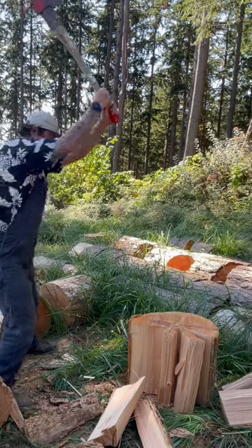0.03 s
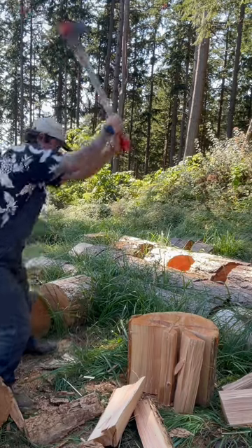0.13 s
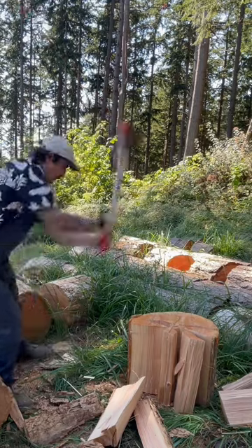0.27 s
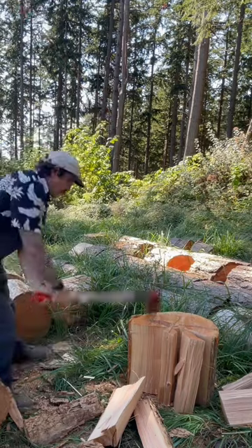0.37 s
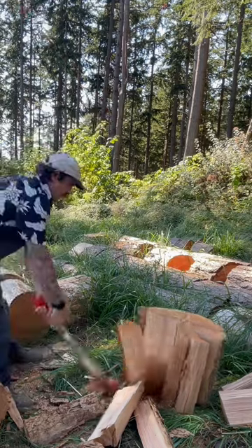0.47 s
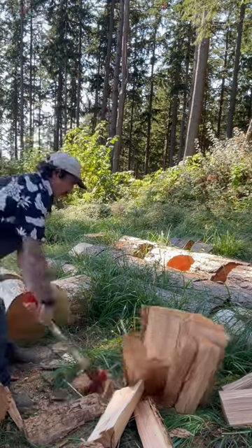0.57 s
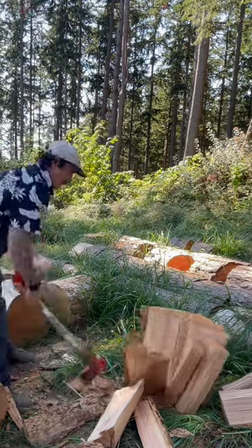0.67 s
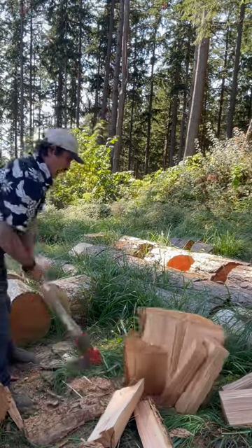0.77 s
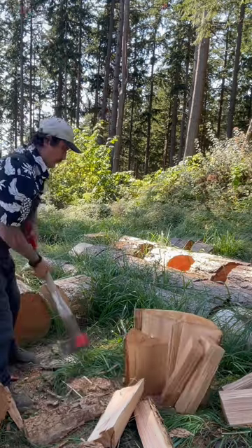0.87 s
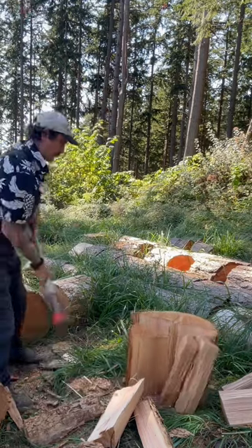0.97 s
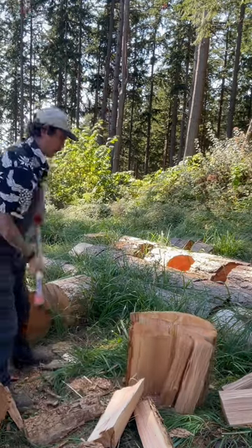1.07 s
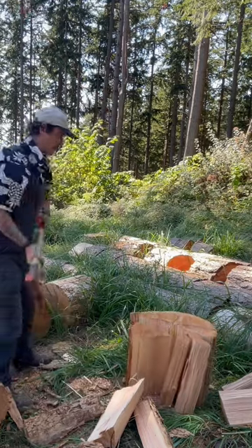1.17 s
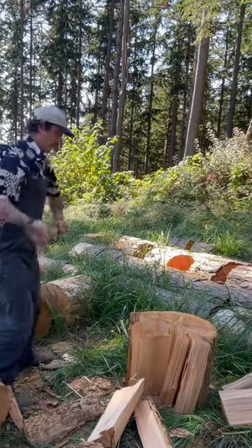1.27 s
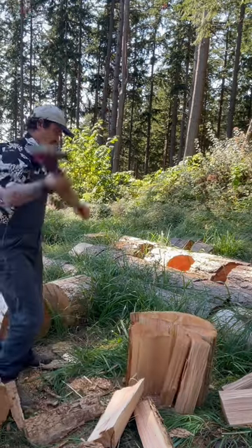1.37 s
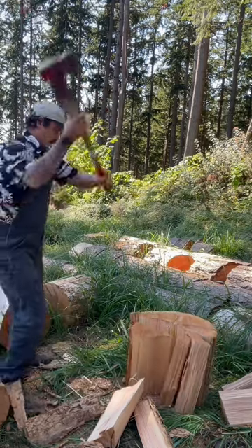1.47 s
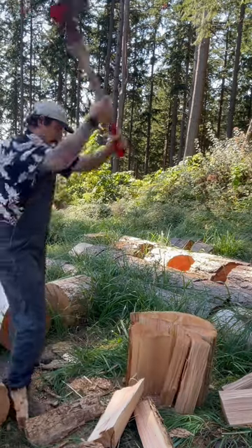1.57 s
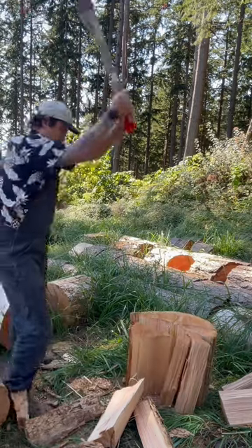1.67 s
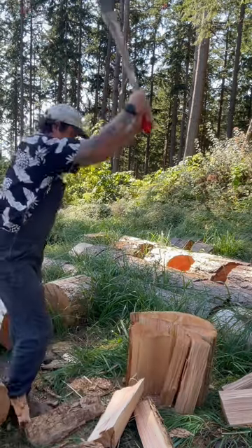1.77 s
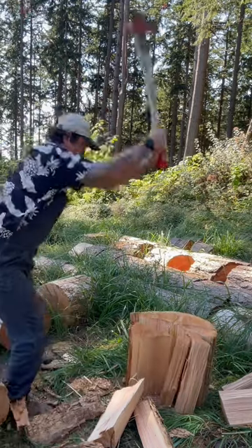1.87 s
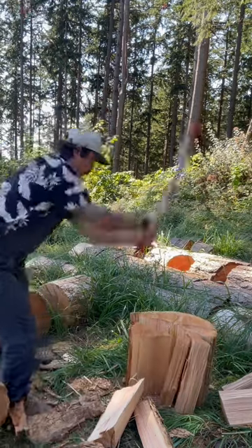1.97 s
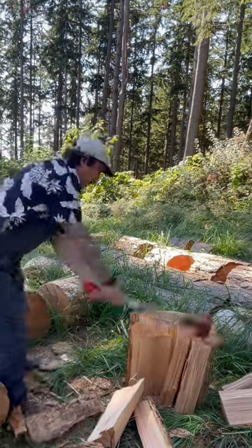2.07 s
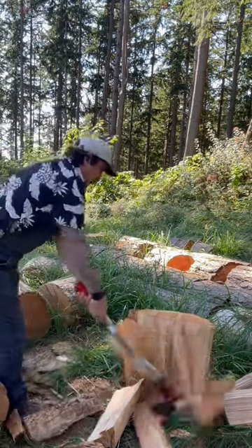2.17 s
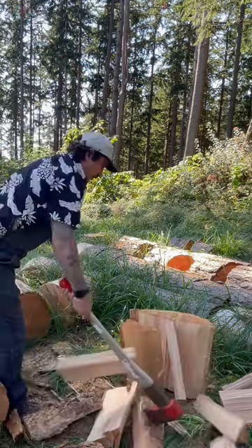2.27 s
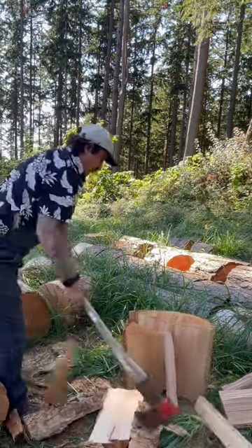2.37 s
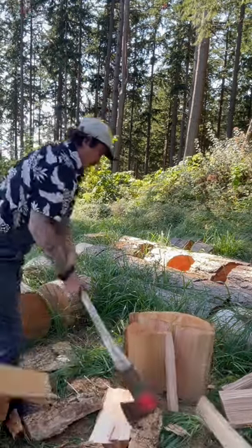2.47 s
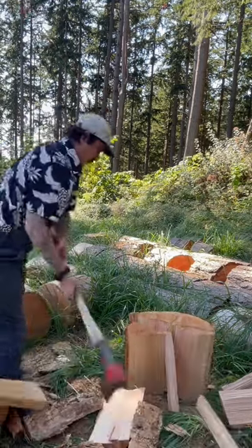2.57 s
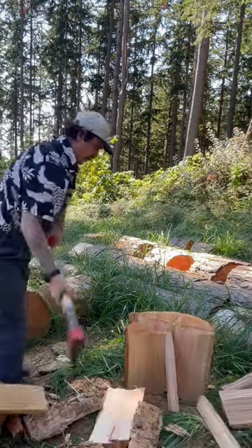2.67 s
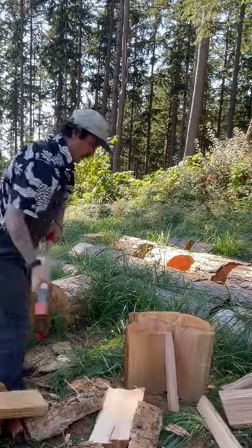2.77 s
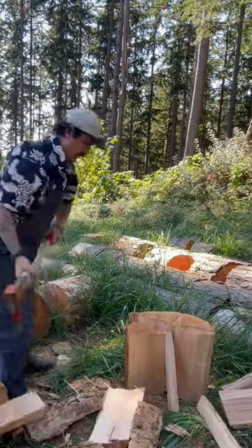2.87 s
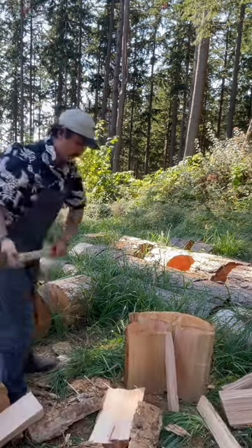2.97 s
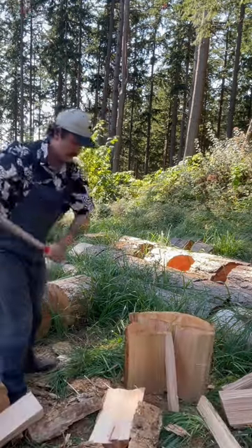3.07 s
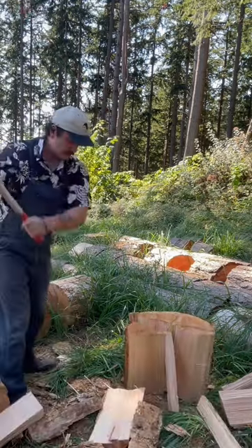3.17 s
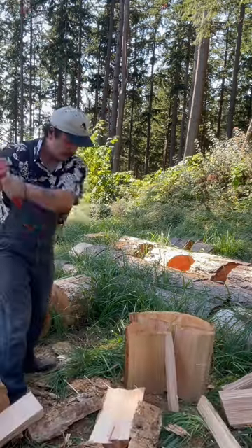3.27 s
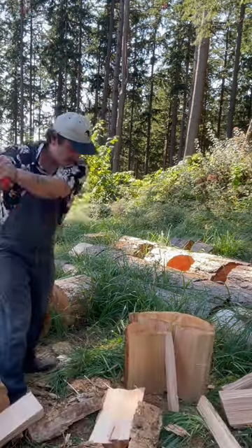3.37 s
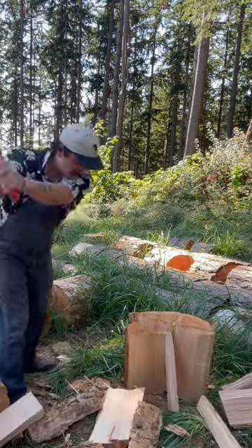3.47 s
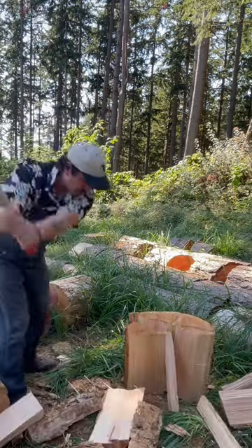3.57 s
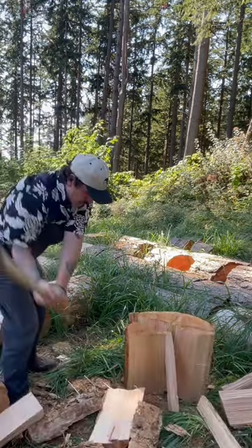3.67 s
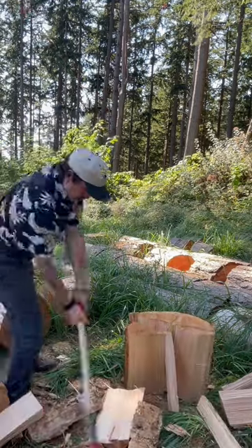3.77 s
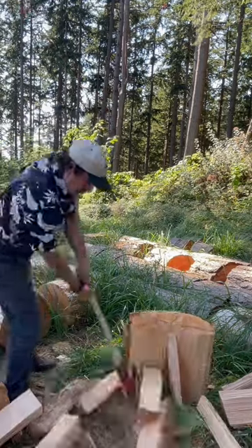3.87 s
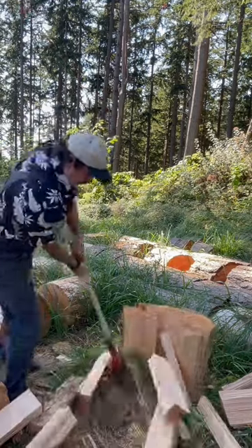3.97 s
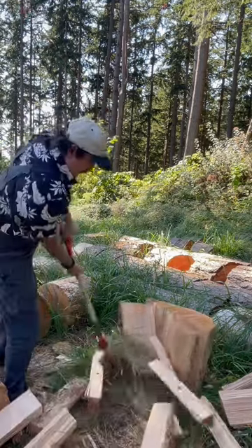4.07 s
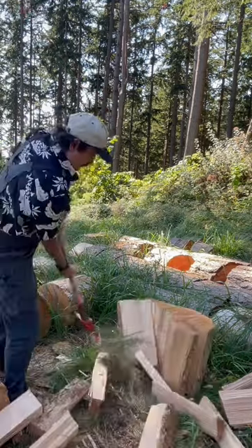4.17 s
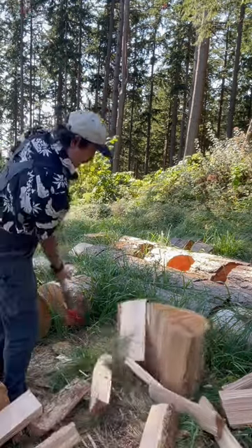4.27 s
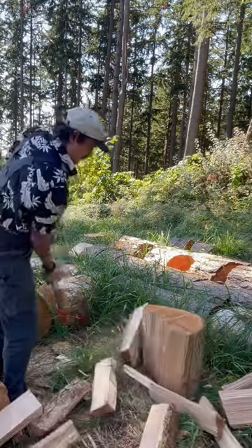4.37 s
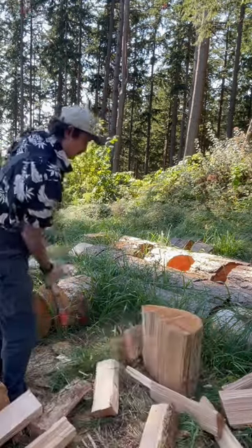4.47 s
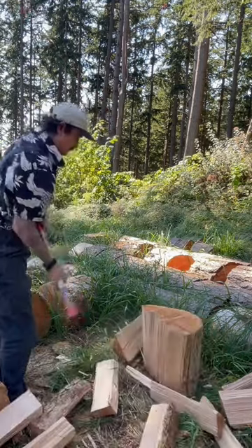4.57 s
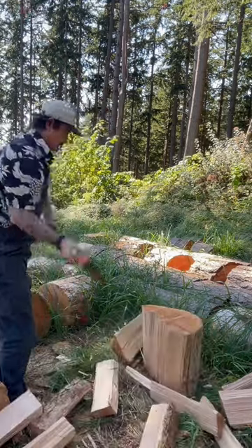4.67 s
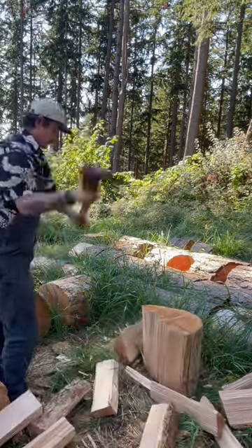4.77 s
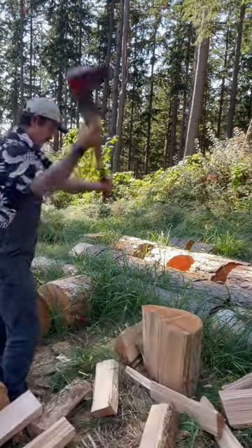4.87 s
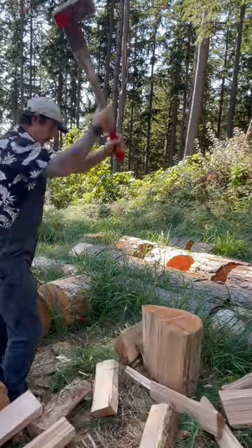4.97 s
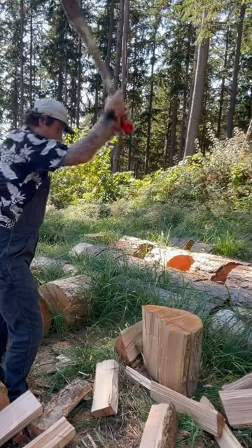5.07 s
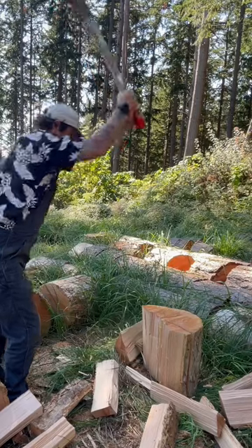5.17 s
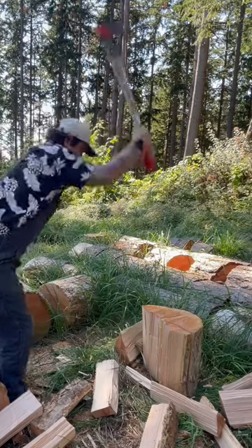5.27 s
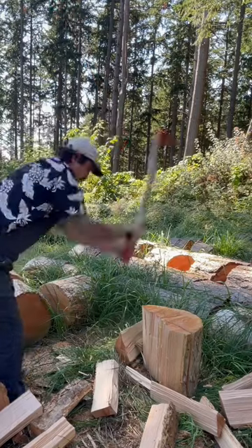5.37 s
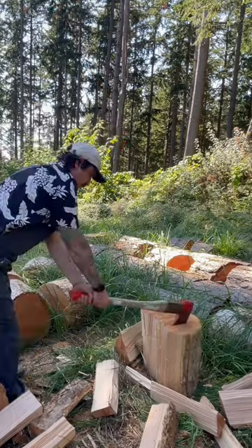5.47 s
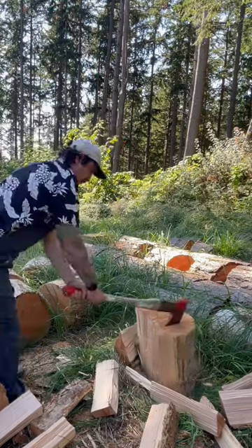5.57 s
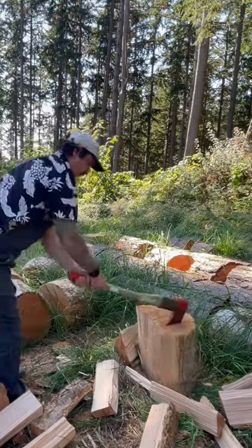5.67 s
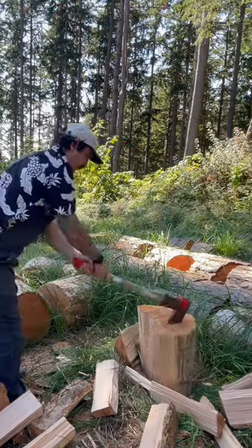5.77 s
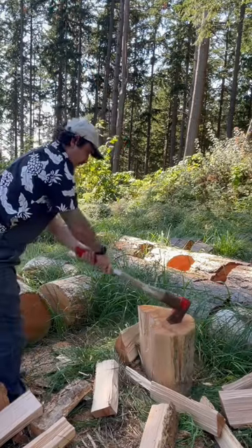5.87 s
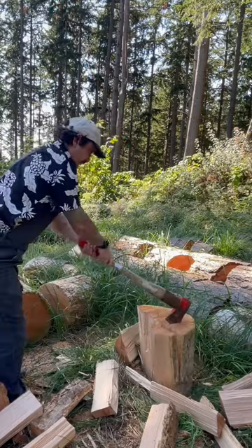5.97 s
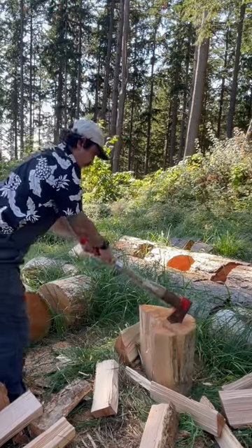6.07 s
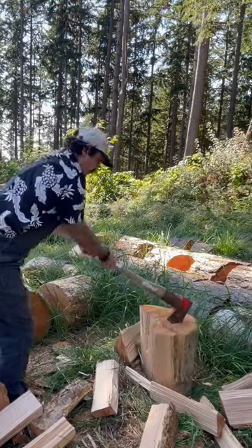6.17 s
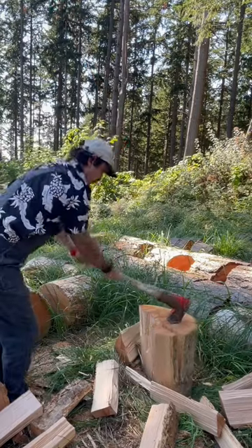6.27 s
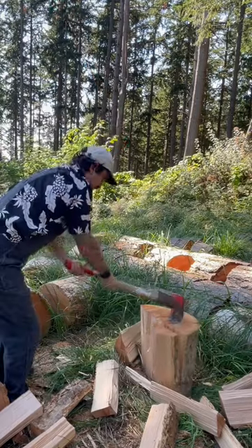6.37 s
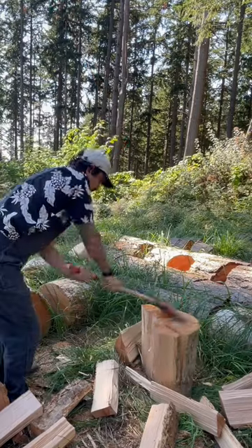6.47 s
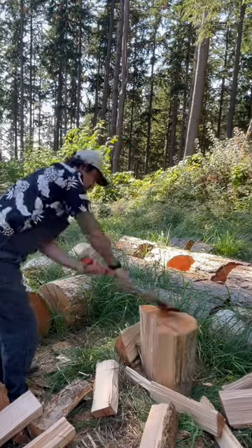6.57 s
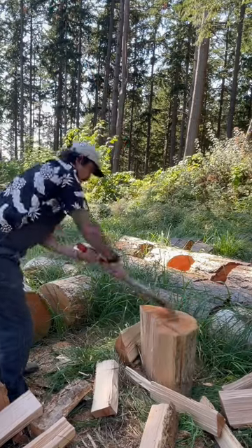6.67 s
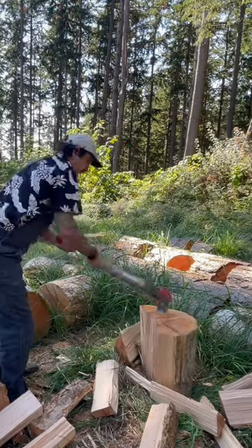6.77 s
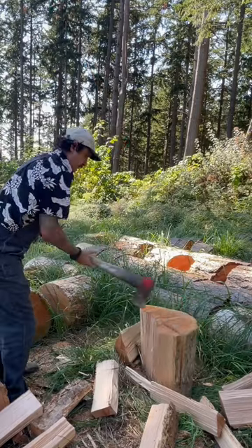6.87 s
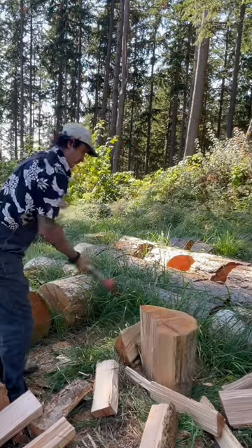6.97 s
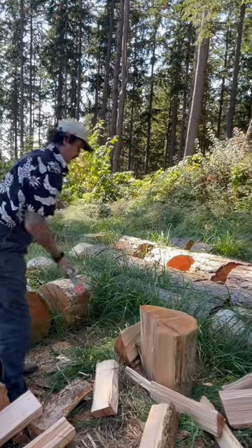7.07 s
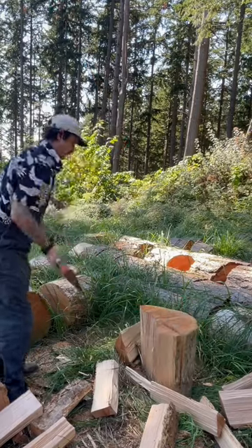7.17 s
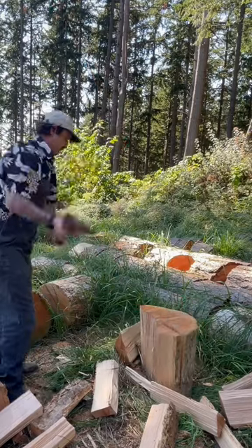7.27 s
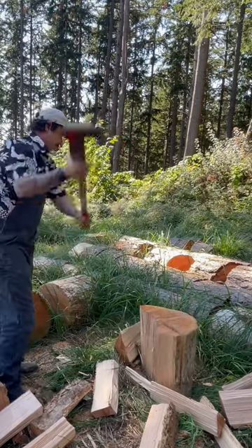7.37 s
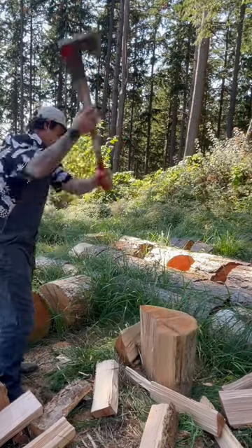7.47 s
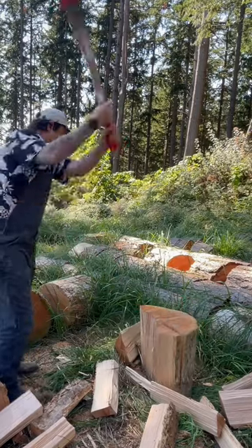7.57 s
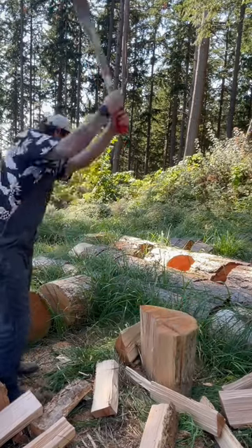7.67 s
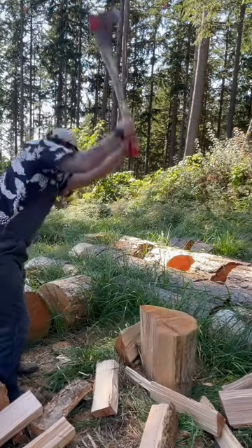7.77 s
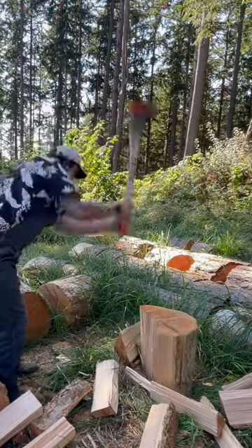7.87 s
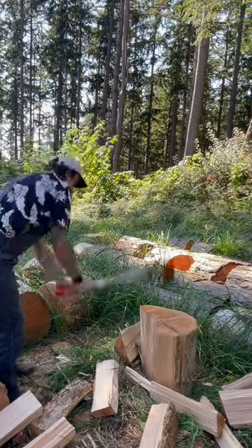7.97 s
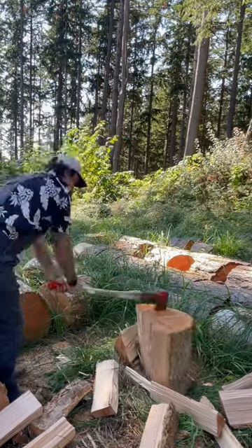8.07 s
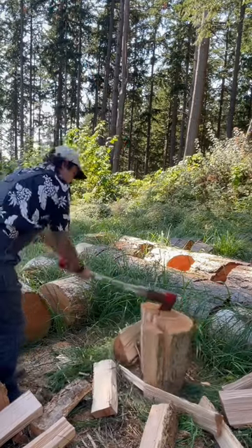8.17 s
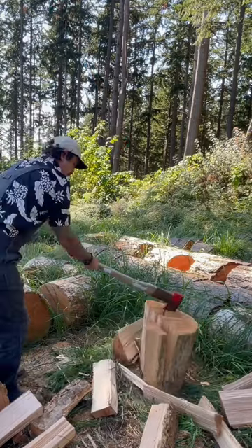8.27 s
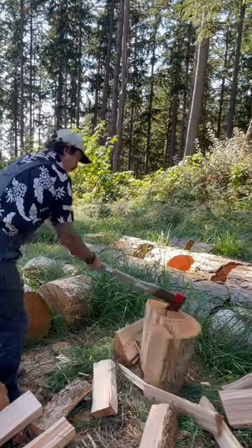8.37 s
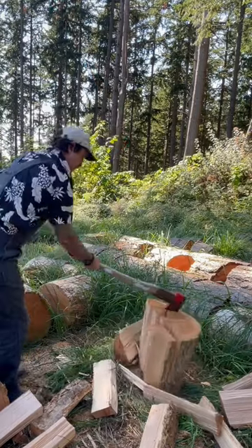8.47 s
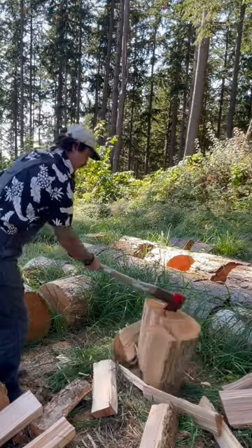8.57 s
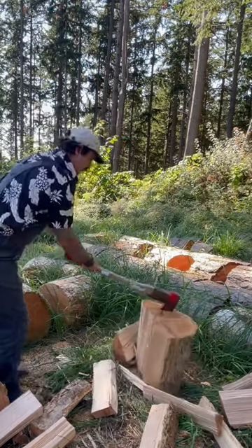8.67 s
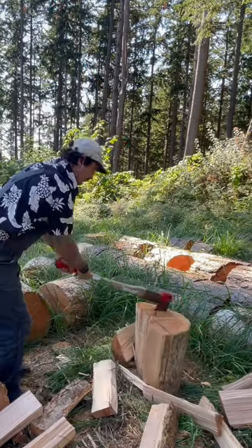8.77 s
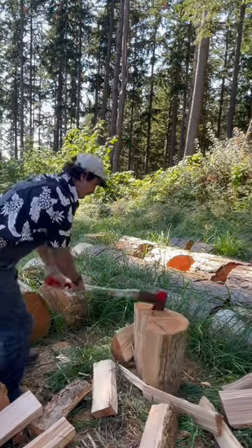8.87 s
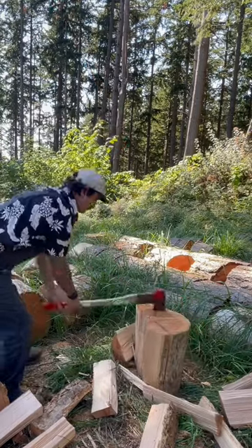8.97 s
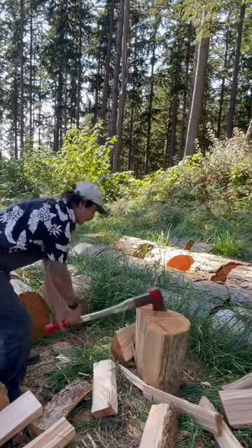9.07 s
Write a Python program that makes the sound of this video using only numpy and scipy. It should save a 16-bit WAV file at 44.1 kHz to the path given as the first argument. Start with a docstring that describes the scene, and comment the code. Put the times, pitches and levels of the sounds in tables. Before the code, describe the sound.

An axe works through a log on soft ground, heard from a few steps away. The first chop is a plain crack; the second throws off a ringing slab on the left; the third bursts into loud knocks and scrapes. The fourth sticks, and the blade is levered out with gritty creaks and a loud woody clap. A final thudding blow leaves ticking fibres. Boots crunch chips; trees return a faint wash.

```python
"""An axe splits firewood in a forest clearing, a few steps from a two-port microphone.
Each chop is a volley of fibre clicks, damped modes of log and block, and a soft thump of the soil.
Billets knock and land as ringing modes, a slab bounces to the left, and chips settle as clumped grains.
The stuck blade is levered free in slips and jerks. Sleeves, boots and a palm brush and slap.
The trees return a diffuse echo over shaped-noise rumble, air, rustle and drone, and a thin far bird."""
import sys
import numpy as np
from scipy import signal
from scipy.fft import rfft, irfft
from scipy.io import wavfile
from scipy.ndimage import uniform_filter1d

SR = 44100
rng = np.random.default_rng(int(sys.argv[2]) if len(sys.argv) > 2 else 0)


def bounce(signal):
    """Save signal as a 16-bit WAV file at the path given by the first command-line argument."""
    frames = np.transpose(np.atleast_2d(signal))
    limited = np.clip(frames, -1, 1)
    pcm = np.round(limited * 32767).astype(np.int16)
    wavfile.write(sys.argv[1], SR, pcm)


N = 402180
T = np.arange(SR // 3) / SR  # time within one hit, in seconds
HZ = np.fft.rfftfreq(N, 1 / SR)


def amp(db):
    """Decibels to gain."""
    return 10 ** (np.asarray(db) / 20)


def evened(x):
    """Scales to rms 1."""
    return x / np.sqrt(np.mean(x ** 2) + 1e-20)


def burst(x):
    """Scales a hit to the energy of 10 ms at rms 1."""
    return x / np.sqrt(np.sum(x ** 2) * 100 / SR + 1e-20)


def read(points, hz):
    """Joins (Hz, value) points on a log-frequency axis."""
    f, value = np.transpose(points)
    return np.interp(np.log(hz + 1), np.log(f + 1), value)


def add(mix, s, sound):
    """Mixes a sound in at time s, in seconds."""
    part = mix[round(s * SR):][:len(sound)]
    part += sound[:len(part)]


def colour(x, spectrum, size=2048):
    """Causal (minimum-phase) filter with the given spectrum."""
    log_gain = np.log(amp(read(spectrum, abs(np.fft.fftfreq(size, 1 / SR)))))
    taps = np.fft.ifft(np.exp(np.conj(signal.hilbert(log_gain)))).real
    return signal.oaconvolve(x, taps[:size // 2])[:len(x)]


def dulled(x, cutoff_hz):
    """Takes the edge off a sound, as soft contact does: a first-order low-pass."""
    return signal.lfilter(*signal.butter(1, min(cutoff_hz, SR / 3), fs=SR), x)


def swell(sound):
    """A movement that starts and ends softly."""
    return evened(sound) * np.hanning(len(sound))


def noise(spectrum):
    """Steady noise with the given spectrum, at rms 1."""
    return evened(irfft(rfft(rng.standard_normal(N)) * amp(read(spectrum, HZ)), N))


def grains(t, per_s, spread_db):
    """Random clicks of uneven size and sign."""
    chance, size, sign = rng.random((3, len(t)))
    size = np.minimum(-np.log(1 - size), 4)  # exponential sizes, capped
    return (chance < per_s / SR) * np.sign(sign - .5) * amp(spread_db * size)


def ring(modes, factor, spread):
    """Damped modes; each blow lands elsewhere and shifts them slightly, and small pieces die sooner."""
    hz, db, t60 = np.transpose(modes)[:, :, None]
    hz = hz * factor * (1 + spread * rng.standard_normal(hz.shape))
    sign = (-1) ** np.arange(len(hz))[:, None]
    decay = np.exp(-np.log(1000) * T * max(factor, 1) / t60)
    return (sign * amp(db) * decay * np.sin(2 * np.pi * hz * T)).sum(0)


def wood(modes, factor, rise, chatter_s=0.011):
    """A piece of wood rings up while it is pushed; a long contact chatters and roughens the ring."""
    free = ring(modes, factor, spread=0.013)
    pushed = burst(free * (1 - np.exp(-(T / rise) ** 2)))
    contacts = grains(T, per_s=3500, spread_db=4.5) * np.exp(-T / rise)
    chatter = burst(signal.fftconvolve(free, contacts)[:len(T)])
    return burst(pushed + rise / chatter_s * chatter)


# Low bed of the forest. Each row: frequency in Hz, relative density in dB per Hz.
RUMBLE_SPECTRUM = [(15, -26), (35, -17), (55, 2.5), (85, 4), (125, 0), (180, -14), (340, -25.5),
                   (600, -38.5), (2000, -71)]


def rumble():
    """Steady noise gathered in the bass."""
    return amp(-51.5) * noise(RUMBLE_SPECTRUM)


# Quiet open air. Each row: frequency in Hz, relative density in dB per Hz.
AIR_SPECTRUM = [(50, -6.5), (300, 6.5), (620, -4), (950, 4), (1250, -8), (1600, -2), (2500, -10.5),
                (9000, -19), (16000, -27.5)]


def air():
    """Soft broadband noise, drawn afresh for each port."""
    return amp(-66) * noise(AIR_SPECTRUM)


# A narrow hum. Each row: frequency in Hz, relative density in dB per Hz.
DRONE_SPECTRUM = [(205, -42.5), (256, -1), (310, -40)]
# Its slow swell and fade. Each row: time in seconds, level in dB.
DRONE_SWELL = [(5.199, -72.5), (5.801, -65), (7.4, -78), (8.1, -65)]


def drone():
    """A far drone: narrow noise whose level follows straight dB ramps."""
    return amp(np.interp(np.arange(N) / SR, *np.transpose(DRONE_SWELL))) * noise(DRONE_SPECTRUM)


STILL_S, STILL_DB = 0.43, -2.5  # the quieter spell before each chop
UNREST_DB = 7


def twigs():
    """Grass and small twigs rustle softly and unevenly, less while the axe is overhead."""
    t = np.arange(N) / SR
    knots = np.arange(0, t[-1] + 1, .09)
    unrest = np.interp(t, knots, rng.uniform(-1.2, 1, len(knots)))
    overhead = sum(1. * ((t > s - STILL_S) & (t < s)) for s, *_ in AXE_BLOWS)
    still = uniform_filter1d(overhead, size=4000)
    flecks = grains(t, per_s=1500, spread_db=6.5) * amp(UNREST_DB * unrest)
    return amp(-73 + STILL_DB * still) * evened(colour(flecks, CHIP_SPECTRUM))


# Modes of a split billet. Each row: frequency in Hz, level in dB, 60 dB decay in seconds,
# at pitch factor 1; the factor scales the frequency, and above 1 shortens the decay.
BILLET_MODES = [(400, -15.5, 0.02), (533, -10, 0.02), (780, -7, 0.033), (900.3, 2.5, 0.034),
                (1016, -6.5, 0.055), (1420, -13.5, 0.049), (1645, -12, 0.064), (2040, -13, 0.022),
                (2640, -16, 0.015), (3500, -19, 0.023)]


def clatter(t, per_s, pitch, count=6):
    """Small pieces of several sizes tap against each other, the smallest most faintly."""
    out = 0
    for size in np.geomspace(.6, 2.4, count):  # a pitch factor: higher means smaller
        piece = ring(BILLET_MODES, pitch * size, spread=0.11) * np.exp(-T / 0.0037) / max(size, 1)
        out = out + signal.fftconvolve(grains(t, per_s, spread_db=4.0), piece[:len(t)])[:len(t)]
    return out


# Tone of crunching chips. Each row: frequency in Hz, relative density in dB per Hz.
CHIP_SPECTRUM = [(100, -13.5), (400, -6), (900, 6.5), (1800, 0), (3500, -8), (7000, -4.5), (11000, 1.5),
                 (16000, -14)]
CRUNCHES_PER_S, CLATTERS_PER_S = 520, 50  # clatters count for each size of piece


def chips(t):
    """Wood chips crunch in clumps and clatter."""
    clumps = evened(uniform_filter1d(rng.standard_normal(len(t)), size=400))
    crunch = evened(grains(t, per_s=CRUNCHES_PER_S, spread_db=4.5) * amp(5.3 * clumps))
    crunch = evened(colour(crunch + .5 * rng.standard_normal(len(t)), CHIP_SPECTRUM))
    return evened(crunch + amp(0.5) * evened(clatter(t, per_s=CLATTERS_PER_S, pitch=1.8)))


# Boots shifting among the chips. Each row: middle in seconds, level in dB.
BOOT_STEPS = [(0.323, -53.5), (1.097, -59), (1.53, -52.5), (2.908, -50.5), (4.488, -51.5), (7.274, -64),
              (8.77, -52.5)]
STEP_S = 0.18
DEBRIS_PEAK_S, DEBRIS_FADE_S = 0.068, 0.27  # time constants of the rise and the fade


def stirring():
    """Debris rains down and settles after each chop; boots shift in between."""
    out, t = np.zeros(N), np.arange(SR) / SR
    settling = (1 - np.exp(-(t / DEBRIS_PEAK_S) ** 2)) * np.exp(-t / DEBRIS_FADE_S)
    for s, *_, debris_db in AXE_BLOWS:
        add(out, s, amp(debris_db) * settling / settling.max() * chips(t))
    for s, db in BOOT_STEPS:
        add(out, s - STEP_S / 2, amp(db) * swell(chips(np.arange(0, STEP_S, 1 / SR))))
    return out


HISS_S, HISS_DB, HISS_HZ = 0.03, -33, 1550


def hisses():
    """A faint narrow hiss near 1.55 kHz, resonant noise, swells just before each blow."""
    out, rise = np.zeros(N), np.linspace(0, 1, round(HISS_S * SR))
    for s, *_ in AXE_BLOWS:
        soft = dulled(rng.standard_normal(len(rise)), HISS_HZ)
        hiss = evened(signal.lfilter(*signal.iirpeak(HISS_HZ, 3, fs=SR), soft))
        add(out, s - HISS_S, amp(HISS_DB) * rise ** 3 * hiss)
    return out


# Tone of breaking fibres. Each row: frequency in Hz, relative density in dB per Hz.
CRACK_SPECTRUM = [(80, -23), (250, -6), (500, -1.5), (680, -2), (1000, 1.5), (1700, 3), (2600, -1),
                  (3600, -7), (4800, -4.5), (6700, -11), (16000, -5.5)]


def crack(length):
    """Fibres break in a dense volley for as long as the contact lasts."""
    fade = np.exp(-(T / length) ** 2) + .07 * np.exp(-T / (3.5 * length))
    volley = (1 - np.exp(-T / 0.00047)) * fade
    return burst(colour(grains(T, per_s=15000, spread_db=0.0) * volley, CRACK_SPECTRUM))


def tear(length):
    """The split runs on down the grain in scattered snaps."""
    scatter = (T / length) * np.exp(-T / length)
    return burst(colour(grains(T, per_s=3000, spread_db=-2.5) * scatter, CRACK_SPECTRUM))


# Modes of the chopping block. Each row: frequency in Hz, level in dB, 60 dB decay in seconds.
BLOCK_MODES = [(257, 1, 0.034), (229, -18, 0.13), (350, -6, 0.013)]


def block():
    """The chopping block gives a low knock and hums on briefly."""
    return burst(ring(BLOCK_MODES, 1, spread=.02) * (1 - np.exp(-T / 0.0028)))


# Modes of the soil, before a slight pitch drop and the tilt of each hit.
# Each row: frequency in Hz, level in dB, 60 dB decay in seconds.
GROUND_MODES = [(74, -7.5, 0.07), (123.5, 0, 0.048), (192, -3.5, 0.05), (263, 0, 0.055), (350, -8, 0.045),
                (475, -10, 0.041)]


def thump(tilt_db):
    """The soil takes the weight softly; the tilt in dB per octave leans towards its higher modes."""
    hz, db, t60 = np.transpose(GROUND_MODES)
    modes = np.c_[hz, db + tilt_db * np.log2(hz), t60]
    return burst(ring(modes, 0.97, spread=0.06) * (1 - np.exp(-(T / 0.004) ** 2)))


# Axe blows. Each row: start in seconds, crack level in dB, bite length in seconds, ring level in dB,
# pitch factor of the log, block level in dB, thump level in dB, thump tilt in dB per octave,
# tearing level in dB, falling debris level in dB.
AXE_BLOWS = [(0.3993, -15.5, 0.0038, -10, 0.97, -16.5, -17.5, 1.5, -20, -54.5),
             (2.0865, -17, 0.0044, -12, 0.95, -21, -20, -0.5, -26.5, -47.5),
             (3.806, -12.5, 0.0066, -11.5, 1.06, -11, -18.5, 2.5, -25.5, -47),
             (5.4806, -12.5, .0058, -11, 1.0, -18, -14.5, -2.5, -32.5, -67.5),
             (8.0099, -10, 0.009, -18, 1.03, -7.5, -10.5, -1.5, -26.5, -54.5)]
# Modes of the round log, at pitch factor 1.
# Each row: frequency in Hz, level in dB, 60 dB decay in seconds (shortened by a factor above 1).
LOG_MODES = [(409, -5.5, 0.023), (540, -.5, 0.028), (810, 0.5, 0.029), (900, -1.5, 0.028),
             (1038, 0.5, 0.042), (1510, -8.5, 0.016), (1722, -4.5, 0.038), (2057, -8.5, 0.025),
             (2590, -8, .025), (3436, -10, 0.031)]
REBOUND_S, REBOUND_DB = .025, -18.5  # the log bounces once on the soil, relative to the thump


def chops():
    """The blade bites and the log rings; a moment later the block knocks and the soil thumps together."""
    out = np.zeros(N)
    for s, crack_db, bite, ring_db, factor, block_db, thump_db, tilt_db, tear_db, _ in AXE_BLOWS:
        add(out, s, amp(crack_db) * crack(bite) + amp(tear_db) * tear(length=0.0077))
        add(out, s, amp(ring_db) * wood(LOG_MODES, factor, rise=0.0025))
        add(out, s + .004, amp(block_db) * block() + amp(thump_db) * thump(tilt_db))
        add(out, s + REBOUND_S, amp(thump_db + REBOUND_DB) * thump(tilt_db))
    return out


# Split pieces knocking on each other, the block or the blade;
# the row at 2.084 is the higher ring of the log in the second chop.
# Each row: start in seconds, level in dB, pitch factor of the modes, contact length in seconds.
WOOD_KNOCKS = [(0.415, -23.5, 1.5, 0.005), (2.084, -15.5, 1.6, .008), (2.112, -18, 1.05, 0.0096),
               (3.8537, -7.5, 1.0, .008), (3.882, -10, 0.99, 0.0071), (3.904, -22.5, 1.05, 0.0081),
               (8.234, -29, 0.92, 0.0036)]
# The shorter the contact, the louder the click; click and thump are relative to the ring.
KNOCK_CONTACT_S, KNOCK_CLICK_DB, CLICK_DB_PER_HALVING, KNOCK_THUMP_DB = 0.0048, -9, 10.5, -11.5


def knocks():
    """Split pieces knock, and the log rings higher in the second chop; a long contact sounds duller."""
    out = np.zeros(N)
    for s, db, factor, contact in WOOD_KNOCKS:
        hardness = KNOCK_CONTACT_S / contact
        body = wood(BILLET_MODES, factor, rise=0.5 * contact, chatter_s=0.0076)
        body = burst(dulled(body, cutoff_hz=1800 * hardness * factor))
        click_db = KNOCK_CLICK_DB + CLICK_DB_PER_HALVING * np.log2(hardness)
        add(out, s, amp(db) * (body + amp(click_db) * crack(contact)))
        add(out, s + 0.0013, amp(db + KNOCK_THUMP_DB) * thump(tilt_db=2.0))
    return out


def litter(length, dull_hz):
    """A muffled crunch: grains that swell and die away, with the tone of chips."""
    crush = grains(T, per_s=1900, spread_db=4.0) * (T / length) * np.exp(-T / length)
    return burst(dulled(colour(crush, CHIP_SPECTRUM), dull_hz))


# Billets landing on chips and soil; the row at 3.886 is the low, soft body of the knock at 3.882.
# Each row: start in seconds, level in dB, pitch factor of the billet.
SOFT_HITS = [(0.439, -31, 1.09), (0.486, -38, 1.24), (0.66, -46, 1.09), (0.75, -51.5, 0.95),
             (2.132, -33.5, 0.87), (2.267, -26.5, 1.19), (2.323, -30, 1.13), (2.346, -33.5, 1.6),
             (3.886, -22, 0.83), (4.187, -33.5, 1.05), (4.491, -35, 0.91)]
SOFT_CONTACT_S, SOFT_CLICK_DB, SOFT_THUMP_DB, SOFT_CRUSH_DB = 0.0081, -12, -1.5, -5.5
# A second, lower hit follows about ROCK_S later, as when a billet's other end lands, and chips scatter.
ROCK_S, ROCK_DB, SCATTERED_CHIPS_DB, SCATTERED_CHIPS_S = .011, -7.5, -14.5, .035


def soft_hits():
    """Landing billets, and the body of one knock: a dull ring, a crunch and a soil thump, each twice."""
    out = np.zeros(N)
    for s, db, factor in SOFT_HITS:
        first = (0, 0, 1)
        second = (ROCK_S * rng.uniform(.5, 1.5), ROCK_DB, .65)
        for delay, hit_db, hit_pitch in (first, second):
            body = wood(BILLET_MODES, factor * hit_pitch, rise=.0045)
            click = amp(SOFT_CLICK_DB) * crack(SOFT_CONTACT_S)
            soil = amp(SOFT_THUMP_DB) * thump(tilt_db=7.0)
            crush = amp(SOFT_CRUSH_DB) * litter(length=0.014, dull_hz=1300)
            add(out, s + delay, amp(db + hit_db) * (body + click + soil + crush))
        add(out, s, amp(db + SCATTERED_CHIPS_DB) * np.exp(-T / SCATTERED_CHIPS_S) * chips(T))
    return out


# Splinters and twigs snapping. Each row: start in seconds, level in dB, brightness in dB per octave.
SPLINTER_SNAPS = [(0.477, -36, 2), (2.104, -13, -1), (2.187, -36, 3), (3.879, -19, -0.5),
                  (3.931, -33.5, -4.5), (3.995, -29.5, 2.5), (4.125, -39.5, -1), (4.157, -39, 1),
                  (8.067, -29.5, 6.5), (8.22, -30.5, 1), (8.233, -21, 5), (8.779, -36, 0.5)]
SNAP_S, SNAP_RING_DB, SNAP_PITCH, SNAP_TILT_HZ = 0.0052, -13, 0.86, 3000


def snaps():
    """A splinter breaks in a short crack, dull or bright, and faintly rings the wood that held it."""
    out = np.zeros(N)
    for s, db, tilt_db in SPLINTER_SNAPS:
        tilt = [(hz, tilt_db * np.log2(hz / SNAP_TILT_HZ)) for hz in (500, 12000)]
        splinter = burst(colour(crack(SNAP_S), tilt))
        add(out, s, amp(db) * (splinter + amp(SNAP_RING_DB) * wood(BILLET_MODES, SNAP_PITCH, rise=0.0026)))
    return out


# Small pieces tipping over. Each row: start in seconds, level in dB, pitch factor of the billet.
LIGHT_TAPS = [(1.11, -50.5, 0.894), (2.471, -51, 2.8), (4.06, -45.5, 1.1), (4.125, -42.5, 2.3),
              (8.143, -37, 1)]


def taps():
    """Light pieces touch with a short, soft ring."""
    out = np.zeros(N)
    for s, db, factor in LIGHT_TAPS:
        add(out, s, amp(db) * wood(BILLET_MODES, factor, rise=0.0034))
    return out


# Sleeves brushing as the axe is lifted. Each row: middle in seconds, level in dB.
AXE_LIFTS = [(1.57, -59.5), (3.24, -58.5), (4.96, -67), (7.53, -57.5)]
# Rubbing of cloth or of steel in the cut. Each row: frequency in Hz, relative density in dB per Hz.
RUB_SPECTRUM = [(200, -33), (900, -14.5), (2000, -20), (3800, -4), (6000, -4), (9000, -7.5), (16000, -4.5)]
LIFT_S = .26


def sleeves():
    """Cloth brushes on each lift: filtered noise that swells and fades."""
    out = np.zeros(N)
    for s, db in AXE_LIFTS:
        brush = colour(rng.standard_normal(round(LIFT_S * SR)), RUB_SPECTRUM)
        add(out, s - LIFT_S / 2, amp(db) * swell(brush))
    return out


GRIP_S, GRIP_DB = 1.712, -40


def grip():
    """A dry slap of the palm on the handle."""
    out = np.zeros(N)
    add(out, GRIP_S, amp(GRIP_DB) * burst(dulled(crack(length=0.0076), cutoff_hz=800)))
    return out


# Wood grinding on wood or shifting over the chips; the row at 8.82 is a long faint handling rustle.
# Each row: middle in seconds, length in seconds, level in dB, pitch factor of the clatter.
SCRAPES_AND_RUSTLE = [(2.308, 0.13, -36.5, .6), (3.865, 0.16, -32.5, 1.3), (8.82, .6, -59, 1.8)]


def scrapes_and_rustle():
    """Rough faces scrape, and handling rustles faintly: many small brief rings under one soft swell."""
    out = np.zeros(N)
    for s, length, db, pitch in SCRAPES_AND_RUSTLE:
        catches = clatter(np.arange(0, length, 1 / SR), per_s=330, pitch=pitch)
        add(out, s - length / 2, amp(db) * swell(catches))
    return out


# Bounces of a slab flung to the left. Each row: start in seconds, ring level in dB,
# overtone level in dB, click level in dB, thump level in dB.
SLAB_BOUNCES = [(2.52, -23.5, -52, -33, -27.5), (2.564, -24, -57, -43, -20.5), (2.668, -41, -67, -45, -47),
                (2.780, -58, -55, -47, -70), (2.804, -52, -51, -54, -38.5), (2.854, -43, -43.5, -39.5, -51),
                (2.893, -39.5, -48, -48, -39), (2.95, -42.5, -36.5, -41.5, -38.5)]
# Overtones of the slab. Each row: frequency in Hz, level in dB, 60 dB decay in seconds.
SLAB_OVERTONES = [(1528, 5, 0.079), (1647, -2, 0.054), (2650, -7, 0.058)]
# The lowest bending note is sharper while it presses on the soil, and stops when the slab lies flat.
SLAB_HZ, SLAB_T60, PRESSED_SHARE, PRESSED_S, SLAB_REST_S = 953, 0.29, 0.087, .01, 2.985


def slab():
    """A dry slab hits the soil and rings on in the air until the next bounce damps it."""
    out = np.zeros(N)
    flights = np.diff([s for s, *_ in SLAB_BOUNCES], append=SLAB_REST_S)
    pressed = np.exp(-T / PRESSED_S)
    turns = np.cumsum(SLAB_HZ * (1 + PRESSED_SHARE * pressed)) / SR
    note = burst(np.sin(2 * np.pi * turns) * (np.exp(-np.log(1000) * T / SLAB_T60) + pressed))
    for (s, ring_db, upper_db, click_db, thump_db), flight in zip(SLAB_BOUNCES, flights):
        damping = np.exp(-np.maximum(T - flight, 0) / 0.0098)
        body = amp(ring_db) * note * damping + amp(upper_db) * wood(SLAB_OVERTONES, 1, rise=0.003)
        click = burst(dulled(crack(length=0.011), cutoff_hz=10000))
        add(out, s, body + amp(click_db) * click + amp(thump_db) * thump(tilt_db=6.0))
    return out


# Thin notes of a far bird. Each row: start in seconds, length in seconds, centre pitch in Hz, level in dB.
BIRD_NOTES = [(2.946, 0.15, 7660, -64), (3.55, 0.14, 7670, -67.5), (7.786, 0.17, 7770, -71)]


def bird():
    """High whistles whose pitch wavers at random by about half a percent."""
    out = np.zeros(N)
    for s, length, hz, db in BIRD_NOTES:
        t = np.arange(0, length, 1 / SR)
        waver = evened(uniform_filter1d(rng.standard_normal(len(t)), size=120))
        whistle = np.sin(2 * np.pi * np.cumsum(hz * (1 + waver / 200)) / SR)
        add(out, s, amp(db) * np.sin(np.pi * t / length) * whistle)
    return out


# The stuck blade slipping in its cut.
# Each row: middle in seconds, length in seconds, ring level in dB, grit level in dB.
BLADE_CREAKS = [(5.983, 0.08, -61, -44), (6.092, 0.14, -50.5, -44.5), (6.431, 0.12, -50.5, -51.5)]
# The blade giving way in jerks. Each row: start in seconds, level in dB, pitch factor of the cut.
BLADE_JERKS = [(5.99, -42, .93), (6.023, -35, .99), (6.142, -33.5, 1.01), (6.42, -43.5, 1.01)]
# Modes of the wood clamped round the blade, at pitch factor 1.
# Each row: frequency in Hz, level in dB, 60 dB decay in seconds (shortened by a factor above 1).
CUT_MODES = [(780, -5, 0.023), (876, 0, 0.046), (1014, -8, 0.037), (2060, -15.5, 0.025), (2540, -15.5, .02)]
SLIPS_PER_S, JERK_CLICK_DB = 420, -8.5
RELEASE_S = 6.4916  # the cut snaps shut as the blade comes free


def levering(count=4):
    """Steel sticks and slips in the cut; slips grate and ring the wood at varied pitches until it snaps shut."""
    out = np.zeros(N)
    for s, length, ring_db, grit_db in BLADE_CREAKS:
        t = np.arange(0, length, 1 / SR)
        slips = [grains(t, per_s=SLIPS_PER_S / count, spread_db=4.0) for _ in range(count)]
        rings = [signal.fftconvolve(part, ring(CUT_MODES, 1, spread=0.0525))[:len(t)] for part in slips]
        body = evened(sum(rings))
        friction = signal.fftconvolve(abs(sum(slips)), np.exp(-T / 0.0013))[:len(t)]
        grit = friction * rng.standard_normal(len(t))
        grating = evened(colour(grit, RUB_SPECTRUM)) + amp(-2.5) * evened(colour(grit, CRACK_SPECTRUM))
        add(out, s - length / 2, amp(ring_db) * swell(body) + amp(grit_db) * swell(grating))
    for s, db, factor in BLADE_JERKS:
        rasp = tear(length=0.004)
        add(out, s, amp(db) * (wood(CUT_MODES, factor, rise=0.0048) + amp(JERK_CLICK_DB) * rasp))
    clap = burst(dulled(crack(length=0.0045), cutoff_hz=2600))
    add(out, RELEASE_S, amp(-11.0) * wood(CUT_MODES, 1, rise=0.0017) + amp(-21) * clap)
    add(out, RELEASE_S, amp(-21) * wood(LOG_MODES, .56, rise=0.0027) + amp(-23) * block())
    return out


# Strained fibres ticking against the stuck blade. Each row: start in seconds, level in dB.
FIBRE_TICKS = [(8.275, -43), (8.406, -46), (8.442, -47), (8.470, -50)]
# Modes of the steel head. Each row: frequency in Hz, level in dB, 60 dB decay in seconds.
STEEL_MODES = [(1930, -4, 0.016), (7650, 8.5, .012)]


def ticks():
    """Single fibres let go and make the axe head ping."""
    out = np.zeros(N)
    for s, db in FIBRE_TICKS:
        click = burst(colour(crack(length=0.0016), RUB_SPECTRUM))
        add(out, s, amp(db) * (click + amp(-5) * burst(ring(STEEL_MODES, 1, spread=0))))
    return out


def nearby(x, t60):
    """Logs close by scatter all but the bass, differently into each port."""
    taps = grains(T, per_s=2100, spread_db=2.0) * (T > .002) * np.exp(-np.log(1000) * T / t60)
    taps = signal.lfilter(*signal.butter(1, 450, "high", fs=SR), taps)
    return signal.fftconvolve(x, taps / np.linalg.norm(taps))[:N]


# Echo of the trees. Each row: frequency in Hz, level in dB, 60 dB decay in seconds.
FOREST_ECHO = [(80, -3, 0.9), (250, 5.5, 1), (700, -0.5, 0.61), (1500, -3.5, 1.8), (2700, 4.5, 0.95),
               (5730, -1.5, 2), (11200, -9, 1.6), (16000, -1, .5)]
# The edge of the wood answers late (share is of echo power), and the echo is uneven.
EDGE_ECHO_S, EDGE_ECHO_WIDTH_S, EDGE_ECHO_SHARE, ECHO_PATCHY_DB = 0.17, 0.059, amp(-6), 3


def forest(x, build):
    """Countless trunks return the energy as a diffuse wash that builds up and dies at each band's own rate."""
    hz, when, z = signal.stft(x, SR, nperseg=256)
    band_hz, db, t60 = np.transpose(FOREST_ECHO)
    decay = amp(-120 * when / read(np.c_[band_hz, t60], hz)[:, None])  # in power
    echo = (1 - np.exp(-when / build)) * decay
    echo *= 1 + EDGE_ECHO_SHARE * np.exp(-((when - EDGE_ECHO_S) / EDGE_ECHO_WIDTH_S) ** 2)
    echo *= amp(read(np.c_[band_hz, db], hz))[:, None] ** 2 / echo.sum(1, keepdims=True)
    sent = uniform_filter1d(abs(z) ** 2, size=7, axis=0)
    power = signal.fftconvolve(sent, echo, axes=1)[:, :len(when)]
    wash = signal.stft(rng.standard_normal(N), SR, nperseg=256)[2]
    patches = uniform_filter1d(rng.standard_normal(wash.shape), size=9, axis=0)
    patches = evened(uniform_filter1d(patches, size=6, axis=1))
    wash *= amp(ECHO_PATCHY_DB * patches)
    wash *= np.sqrt(abs(power) / np.mean(abs(wash) ** 2))
    return signal.istft(wash, SR, nperseg=256)[1][:N]


# The two microphone ports, for sound from ahead and from the far left.
# Each row: frequency in Hz, left minus right level in dB, left lead in radians.
PORTS_AHEAD = [(0, 0, 0), (350, 1, -.1), (900, 0, -1.05), (1200, -2, -2), (1450, -10, -.2), (1950, -1, .3),
               (3200, 2, .7), (4400, 14, .5), (5300, 14, -2.6), (6400, 11, .6), (7400, 9, 2),
               (8000, 1, 2.9), (9100, 0, -1), (9700, 0, -2.9), (10900, 0, -3.8), (11600, 0, -5.8),
               (14000, -1, -9)]
PORTS_FAR_LEFT = [(0, 0, 0), (600, 4, -.8), (850, 11, -1.5), (1150, 9, -2.2), (1900, -5, 0),
                  (3200, -5, 2.6), (5700, 12, 4.5), (8000, 0, 6)]


def ports(x, table):
    """The two ports colour and delay a sound differently, depending on where it comes from."""
    port_hz, *columns = np.transpose(table)
    balance_db, lead = (np.interp(HZ, port_hz, c) for c in columns)
    pair = np.array([amp(balance_db) * np.exp(.5j * lead), np.exp(-.5j * lead)])
    return irfft(rfft(x) * pair / np.sqrt(np.mean(abs(pair) ** 2, axis=0)), N)


SCATTER_T60 = .08  # seconds


def scene():
    """The work at the log, the slab off to the left, their echo in each port, and the quiet of the forest."""
    blows, flung = chops(), slab()
    pieces = knocks() + soft_hits() + snaps() + taps() + scrapes_and_rustle()
    handling = stirring() + sleeves() + grip() + levering() + ticks()
    small = pieces + handling + hisses() + twigs()
    work = blows + small
    shared = work + rumble() + drone() + bird()
    carried = amp(-25.0) * blows + amp(-32.5) * (small + flung)  # sounds at ground level carry less far
    ahead = []
    for _ in range(2):  # echo and air are drawn separately for each port
        scattered = amp(-10) * nearby(work + flung, t60=SCATTER_T60)
        ahead.append(shared + scattered + forest(carried, build=0.0074) + air())
    return ports(np.array(ahead), PORTS_AHEAD) + ports(flung, PORTS_FAR_LEFT)


# Resonance and bass roll-off of the microphone's sound channel. Each row: frequency in Hz, gain in dB.
MIC_RESPONSE = [(0, -12.5), (60, -1.5), (7800, 0.5), (9000, 3), (10200, 0), (11100, 8.5), (12200, -5.5),
                (13600, -14), (16000, -18.5)]
EDGE_HZ = 16300  # upper band limit


def record(dry):
    """The microphone colours the sound; peaks are rounded off; then the band limit."""
    heard = irfft(rfft(dry) * amp(np.interp(HZ, *np.transpose(MIC_RESPONSE))), N)
    rounded = heard / (1 + (heard / .9) ** 6) ** (1 / 6)
    band_limit = signal.firwin(255, EDGE_HZ, window=("kaiser", 9), fs=SR)
    return signal.oaconvolve(rounded, band_limit[None], "same")


dry = scene()
out = record(dry)
bounce(out)
```